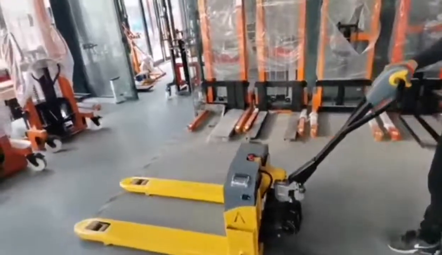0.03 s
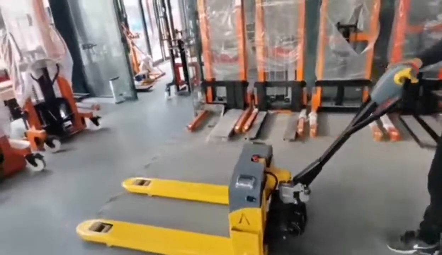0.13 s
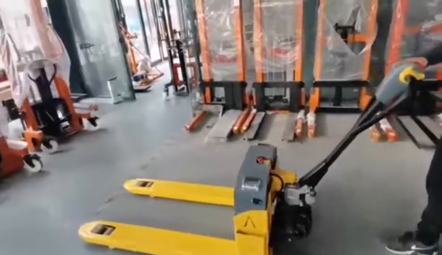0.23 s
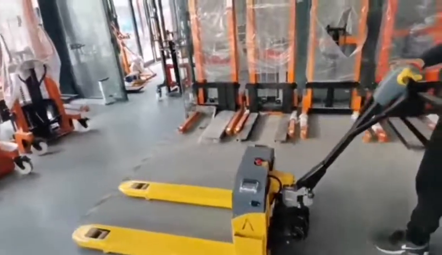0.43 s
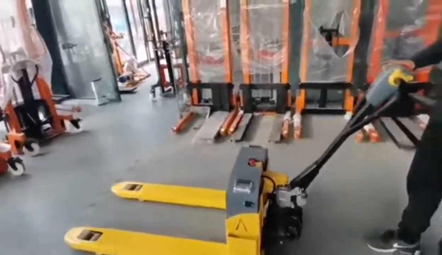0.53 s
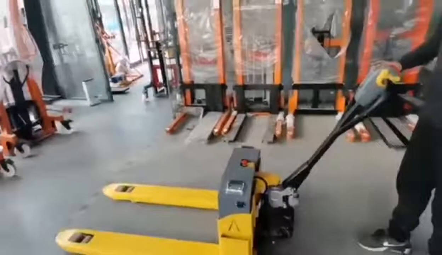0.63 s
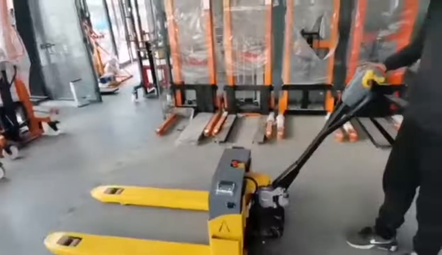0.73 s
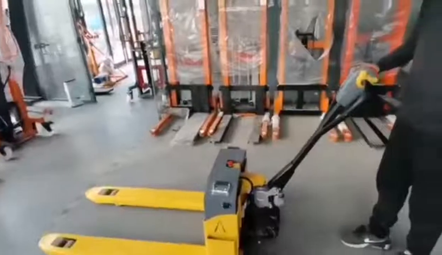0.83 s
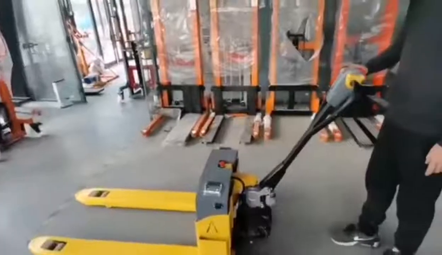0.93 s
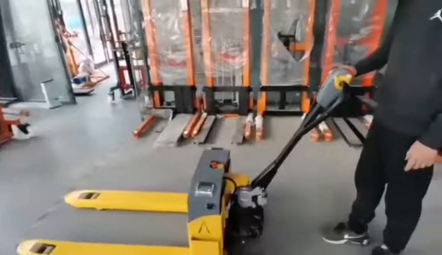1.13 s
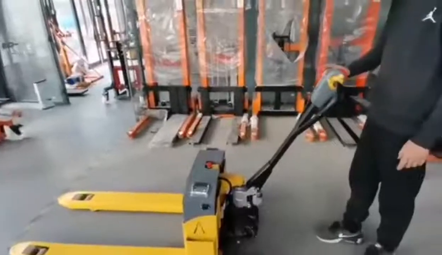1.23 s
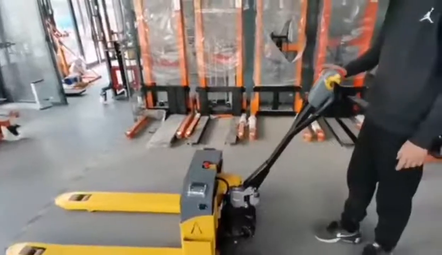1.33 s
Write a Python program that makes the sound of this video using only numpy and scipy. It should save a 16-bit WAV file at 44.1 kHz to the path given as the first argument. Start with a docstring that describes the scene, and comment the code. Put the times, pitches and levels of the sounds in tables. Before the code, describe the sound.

An electric pallet truck rolls with a whine, then stops with a clattering metallic clunk and rattle.

```python
"""Large warehouse: an electric pallet truck rolls in on rumbling wheels, motor whining, and stops.
The brake clacks on and the steel frame clunks and rattles into the echo; after a quiet moment
the brake clacks free and the truck rolls again. Bursts of metal contacts and soft knocks ring modes
and coloured noise; whines are tones with noisy skirts; coloured noise makes wheels and ventilation."""
import sys
import numpy as np
from scipy import signal
from scipy.fft import rfft, irfft
from scipy.io import wavfile

SR = 44100
rng = np.random.default_rng(int(sys.argv[2]) if len(sys.argv) > 2 else 0)


def natural_amplitude(level_db):
    """Convert a level in decibels to a linear amplitude factor, elementwise."""
    exponent = np.asarray(level_db, float) / 20
    return 10 ** exponent


def store_pcm(level_fs):
    """Save levels as 16-bit WAV."""
    pcm = np.round(np.clip(level_fs, -1, 1) * 32767).astype(np.int16)
    wavfile.write(sys.argv[1], SR, np.atleast_2d(pcm).T)


N = 61739

# Low modes of frame and forks. Each row: frequency in Hz, relative level in dB, t60 in seconds.
FRAME_MODES = [(120, -12, .1), (178, -1, .35), (225, -8, .1), (270, -1, .16), (312, 0, .13), (347, 0, .14),
               (367, -1, .22), (405, 1, .12), (432, 0, .12), (545, -6, .13), (612, -6, .1), (787, -7, .1),
               (992, -5, .08), (1075, -11, .06), (1265, -8, .09)]
# Broad part of a thud. Each row: frequency in Hz, relative density in dB per Hz.
THUD_SPECTRUM = [(24, -52), (50, -22.5), (120, -7), (178, -9.5), (220, -3), (340, 3.5), (430, 2),
                 (500, -15), (560, -6), (980, -14.5), (1600, -20), (3200, -27), (5500, -61)]
FRAME_RING_DB = -9
CLANK_TOUCHES_PER_S = 4800
ATTACK_S = 0.003


def rms_one(x):
    """Scale to rms 1."""
    return x / np.sqrt(np.mean(x ** 2) + 1e-20)


def at_hz(points, hz):
    """Interpolate a (Hz, value) table on a log-frequency axis."""
    table_hz, values = np.array(points).T
    return np.interp(np.log(hz), np.log(table_hz), values)


def age_s(start_s):
    """Seconds since an event, 0 before it."""
    return np.maximum(np.arange(N) / SR - start_s, 0)


def bands(x):
    """Overlapping third-octave slices that add up to the noise within their range, with centres in Hz."""
    centres_hz = 25 * 2 ** np.arange(0, 9.4, 1 / 3)
    spectrum = rfft(x)
    bin_hz = np.maximum(np.fft.rfftfreq(len(x), 1 / SR), 1)
    place = 3 * np.log2(bin_hz / centres_hz[0])
    for k, hz in enumerate(centres_hz):
        weight = np.maximum(1 - np.abs(place - k), 0)
        yield hz, irfft(spectrum * weight, len(x))


def colour(x, spectrum):
    """Causal (minimum-phase) colouring, unit gain on white noise."""
    size = 2 ** 14
    bin_hz = np.maximum(np.fft.rfftfreq(size, 1 / SR), 1)
    cepstrum = irfft(at_hz(spectrum, bin_hz) * np.log(10) / 20)
    # fold the cepstrum: all phase becomes minimum phase
    cepstrum[1:size // 2] *= 2
    cepstrum[size // 2 + 1:] = 0
    response = irfft(np.exp(rfft(cepstrum)))
    return signal.fftconvolve(x, response / np.sqrt(np.sum(response ** 2)))[:N]


def modes(x, table):
    """Decaying sines of alternating sign struck by x, unit gain on white noise."""
    t = np.arange(SR // 2) / SR
    response = np.zeros(len(t))
    for k, (hz, db, t60_s) in enumerate(table):
        decay = natural_amplitude(db - 60 * t / max(t60_s, .003))
        response += decay * np.sin(2 * np.pi * hz * t) * (-1) ** k
    return signal.fftconvolve(x, response / np.sqrt(np.sum(response ** 2)))[:N]


def drift(corner_hz):
    """Two-pole low-passed noise, rms 1."""
    r = np.exp(-2 * np.pi * corner_hz / SR)
    noise = rng.standard_normal(N + 8000)
    return rms_one(signal.lfilter([1], [1, -2 * r, r * r], noise)[8000:])  # settled part


def touches(rate_per_s):
    """Metal contacts of uneven size, sign and spacing, rms 1."""
    size_db = 3 * np.minimum(rng.exponential(1, N), 5)
    sizes = natural_amplitude(size_db) * rng.choice([-1, 1], N)
    return rms_one(sizes * (rng.random(N) < rate_per_s / SR))


def burst(start_s, decay_s):
    """Force envelope of a contact: quick rise, exponential fall."""
    age = age_s(start_s)
    return (1 - np.exp(-age / ATTACK_S)) * np.exp(-age / max(decay_s, .002))


def frame_response(force):
    """The frame answers a force with a broad thud and its low modes."""
    return colour(force, THUD_SPECTRUM) + natural_amplitude(FRAME_RING_DB) * modes(force, FRAME_MODES)


def blows():
    """Each blow is a dying burst of contacts that rings the frame low and the linkage high."""
    # Each row: start in s, drive levels of thud, clank and clank's top in dB, rattle decay in s.
    blow_rows = [(0.302, -40.5, -40, -81, 0.036), (0.325, -28.5, -42.5, -72, 0.02),
                 (0.3314, -56, -35.5, -18, .015), (0.349, -30.5, -33.5, -58, 0.028),
                 (0.362, -36, -42.5, -60.5, 0.047), (0.402, -29, -32.5, -25, 0.018),
                 (0.412, -33.5, -34, -32, 0.012), (0.429, -30.5, -41, -43.5, 0.027),
                 (0.452, -36.5, -82, -48, 0.013), (0.478, -35.5, -70, -59, 0.026),
                 (0.516, -46, -76, -75, 0.025), (0.561, -44, -81, -57, 0.027),
                 (0.595, -37, -43.5, -50, 0.027), (0.614, -33.5, -47.5, -43.5, 0.011),
                 (0.648, -36, -49, -98, 0.03), (0.711, -34.5, -67, -87, 0.0086),
                 (0.746, -43.5, -62.5, -92, 0.013), (0.769, -47, -53, -98, 0.018),
                 (0.813, -52.5, -60, -77, 0.028), (0.844, -53, -73.5, -69, 0.024),
                 (0.874, -50.5, -74, -90, 0.018), (0.953, -66.5, -84, -86, 0.013),
                 (0.902, -58.5, -62, -94, 0.014), (1.202, -74.5, -66, -67, 0.011),
                 (1.291, -69, -75, -55, 0.02), (1.321, -52, -50.5, -54.5, 0.029),
                 (1.358, -57, -67, -61, 0.025), (1.386, -42.5, -69, -51, 0.043)]
    # Broad part of a clank. Each row: frequency in Hz, relative density in dB per Hz.
    clank_spectrum = [(300, -35), (700, -11.5), (950, 8), (1300, 1.5), (1600, -3.5), (2200, 2), (3500, -7),
                      (5160, -3.5), (7400, -13.5), (8300, -31.5), (9300, -35.5), (11000, -15.5),
                      (13000, -34), (15000, -50.5)]
    # High modes of the linkage. Each row: frequency in Hz, relative level in dB, t60 in s.
    linkage_modes = [(1800, -4, .012), (2620, -2, .02), (3300, -5, .008), (5000, -4, .006),
                     (6610, -3, .005), (9300, -2, .005), (11500, -10, .005)]
    thud_touches_per_s, top_from_hz, linkage_ring_db = 700, 7330, -5.5

    force = np.zeros((3, N))
    for start_s, *levels_db, decay_s in blow_rows:
        force += natural_amplitude(levels_db)[:, None] * burst(start_s, decay_s)
    thud, clank, top = force
    low = thud * touches(thud_touches_per_s)
    sharp = touches(CLANK_TOUCHES_PER_S)
    below = signal.butter(4, top_from_hz, "low", fs=SR, output="sos")
    above = signal.butter(4, top_from_hz, "high", fs=SR, output="sos")
    high = signal.sosfilt(below, clank * sharp) + signal.sosfilt(above, top * sharp)
    linkage = colour(high, clank_spectrum) + natural_amplitude(linkage_ring_db) * modes(high, linkage_modes)
    return frame_response(low) + linkage


def knocks():
    """Firm single knocks within the rattle: low-passed impulses into the frame."""
    # Each row: start in s, push level in dB before softening.
    knock_rows = [(.327, -45.5), (.34, -46), (.367, -37), (.415, -28), (.426, -33), (.437, -36.5),
                  (.45, -34), (.484, -41.5), (.511, -33), (.562, -37), (.593, -37.5), (.632, -38.5),
                  (.838, -60), (1.336, -52), (1.353, -50.5), (1.37, -51), (1.381, -49.5), (1.388, -50.5)]
    spread_s, soft_hz = 0.012, 897
    push = np.zeros(N)
    for start_s, db in knock_rows:
        # energy of noise at this level lasting spread_s
        push[int(start_s * SR)] = natural_amplitude(db) * np.sqrt(SR * spread_s)
    push = signal.sosfilt(signal.butter(2, soft_hz, fs=SR, output="sos"), push)
    return frame_response(push)


def brake():
    """The plate clacks on, chatters faintly and clacks off: short rattles into the brake's modes."""
    # Each row: start in s, drive level in dB, rattle decay in s.
    clack_rows = [(0.3116, -35, 0.0067), (0.579, -47, 0.037), (1.207, -59, 0.0023), (1.329, -36.5, 0.014),
                  (1.336, -70, 0.027)]
    # Each row: frequency in Hz, relative level in dB, t60 in s.
    plate_modes = [(740, 2, .12), (965, 1, .09), (1250, -4, .08), (2450, -4, .02), (2750, -2, .025),
                   (3030, -1, .02), (3480, -2, .045), (4500, 0, .01), (6000, -1, .008)]
    force = sum(natural_amplitude(db) * burst(start_s, decay_s) for start_s, db, decay_s in clack_rows)
    return modes(force * touches(CLANK_TOUCHES_PER_S), plate_modes)


def ringing_tones():
    """Quick-rising, dying sines: faint rings after the blows, a small tick's upper partials, a last low tone."""
    # Each row: start in s, frequency in Hz, level in dB, t60 in s.
    tone_rows = [(.805, 727, -52.5, 0.17), (0.88, 1020, -55, 0.12), (.975, 1000, -60, 0.1),
                 (1.02, 920, -60, 0.11), (1.204, 2800, -67.5, 0.077), (1.205, 3300, -65, .05),
                 (1.3, 4700, -68, 0.033), (1.376, 290, -44, .2), (.612, 2700, -48, 0.11)]
    out = np.zeros(N)
    for start_s, hz, db, t60_s in tone_rows:
        age = age_s(start_s)
        envelope = natural_amplitude(db - 60 * age / t60_s) * (1 - np.exp(-age / ATTACK_S))
        out += envelope * np.sin(2 * np.pi * hz * age)
    return out


def bounces():
    """The heavy body bounces on its drive wheel's tyre: soft, damped low sines."""
    # Each row: start in s, level in dB before the envelope.
    bounce_rows = [(.2, -38.5), (0.314, -33.5), (0.428, -41), (0.587, -37), (0.67, -42), (0.777, -40.5),
                   (0.862, -55.5), (1.14, -52), (1.288, -52), (1.334, -41.5), (1.365, -40.5)]
    bounce_hz, rise_s, fall_s = 79, .007, .022
    out = np.zeros(N)
    for start_s, db in bounce_rows:
        age = age_s(start_s)
        envelope = (1 - np.exp(-age / rise_s)) * np.exp(-age / fall_s)
        out += natural_amplitude(db) * envelope * np.sin(2 * np.pi * bounce_hz * age)
    return out


def whine(hz, clean):
    """A tone with a noisy skirt, rms 1; clean is the pure tone's share of the power."""
    width_hz = 55
    phase = 2 * np.pi * np.cumsum(hz) / SR
    skirt = drift(width_hz) * np.cos(phase) + drift(width_hz) * np.sin(phase)
    return np.sqrt(2 * clean) * np.cos(phase) + np.sqrt(1 - clean) * skirt


def rolling():
    """Wheels rumble and hiss as noise; the motor whine glides, the gearbox rings at a steady pitch."""
    # Each row: time in s, mid wheel level in dB, motor whine in Hz, whine level in dB,
    # gearbox ring level in dB.
    roll_rows = [(0, -48.5, 665.3, -50.5, -58), (0.031, -50, 671, -56, -65), (0.06, -50, 694, -57.5, -74),
                 (0.084, -49, 732.6, -62, -62), (0.112, -52, 740, -49, -61), (0.135, -51, 753, -51, -49),
                 (0.164, -51, 741, -60, -68), (0.182, -45, 731, -49, -57), (0.2, -47, 739, -54, -47.5),
                 (0.221, -52, 744, -57, -39), (0.23, -48.5, 773, -55, -40), (0.237, -45, 733, -54, -40),
                 (.255, -48, 737, -53, -49.5), (0.281, -52.5, 740, -67, -48.5), (0.3, -55, 770, -68, -65.5),
                 (.4, -100, 700, -100, -100), (1.322, -100, 700, -100, -100), (1.343, -59, 754, -79, -80),
                 (1.4, -57, 763, -73, -83)]
    # Each row: frequency in Hz, relative density in dB per Hz.
    wheel_spectrum = [(24, -40.5), (45, -14), (76, -5.5), (200, -13.5), (264, -5.5), (560, -17),
                      (776, -7.5), (922, -18.5), (1360, -15), (3300, -29), (4880, -23), (8400, -32),
                      (9300, -24.5), (11500, -35), (14000, -38.5)]
    gear_hz, motor_clean, gear_clean = 793, .25, .7

    time_s, *columns = np.transpose(roll_rows)
    t = np.arange(N) / SR
    wheel_db, motor_hz, motor_db, gear_db = [np.interp(t, time_s, c) for c in columns]
    wheel_gain = natural_amplitude(wheel_db + 2.36 * drift(18.4))  # uneven level
    wheels = wheel_gain * colour(rng.standard_normal(N), wheel_spectrum)
    motor = natural_amplitude(motor_db) * whine(motor_hz, motor_clean)
    gearbox = natural_amplitude(gear_db) * whine(np.full(N, gear_hz), gear_clean)
    return wheels + motor + gearbox


def hall(x):
    """Dense echo: unit-energy noise that builds up quickly and dies band by band."""
    # Each row: frequency in Hz, t60 in s.
    decay_rows = [(60, 1.62), (170, 1.12), (340, 0.54), (700, 0.79), (1400, 0.55), (2700, 0.63),
                  (5400, 0.64), (8000, 0.44), (12000, 0.18)]
    build_s = 0.0016
    t = np.arange(N) / SR
    echo = np.zeros(N)
    for hz, band in bands(rng.standard_normal(N)):
        echo += band * natural_amplitude(-60 * t / at_hz(decay_rows, hz))
    echo *= 1 - np.exp(-t / build_s)
    return signal.fftconvolve(x, echo / np.sqrt(np.sum(echo ** 2)))[:N]


def ventilation():
    """Hall ventilation: coloured noise, its level drifting slightly."""
    # Each row: frequency in Hz, relative density in dB per Hz.
    air_spectrum = [(15, -33), (30, 0), (65, 0), (140, -9.5), (250, -13.5), (430, -17.5), (780, -19),
                    (1200, -22.5), (2400, -30.5), (5000, -35), (9300, -42), (14000, -38.5)]
    mid_db = -65
    return natural_amplitude(mid_db + 1.5 * drift(6.4)) * colour(rng.standard_normal(N), air_spectrum)


def scene():
    """Truck, its echo and the air of the hall."""
    struck_send_db, rolled_send_db = -6.5, -11
    struck = blows() + knocks() + brake() + ringing_tones()
    rolled = rolling() + bounces()
    echo = hall(natural_amplitude(struck_send_db) * struck + natural_amplitude(rolled_send_db) * rolled)
    return (struck + rolled + echo + ventilation())[None]


def band_limit(x):
    """A steep low-pass at the top of the band."""
    return signal.sosfilt(signal.butter(12, 14380, fs=SR, output="sos"), x)


def record(dry):
    """The microphone drops the deepest bass and the very top."""
    low_hz, top_hz = 45, 15200
    low_cut = signal.butter(2, low_hz, "high", fs=SR, output="sos")
    top_cut = signal.cheby2(10, 60, top_hz, fs=SR, output="sos")
    mix = signal.sosfilt(top_cut, signal.sosfilt(low_cut, dry))
    return band_limit(mix)


dry = scene()
out = record(dry)
store_pcm(out)
```